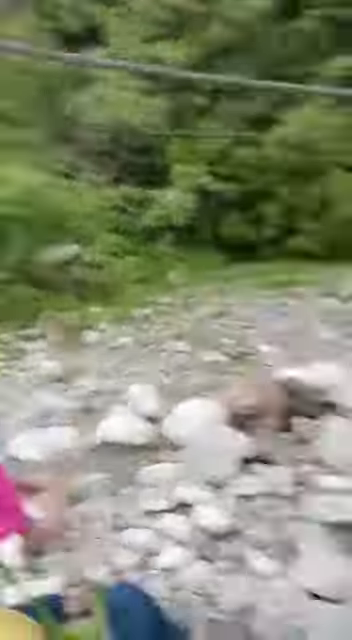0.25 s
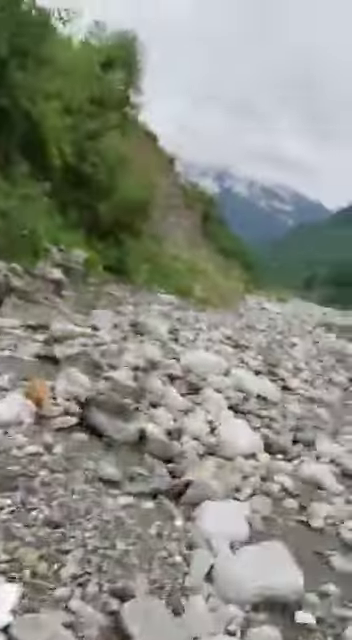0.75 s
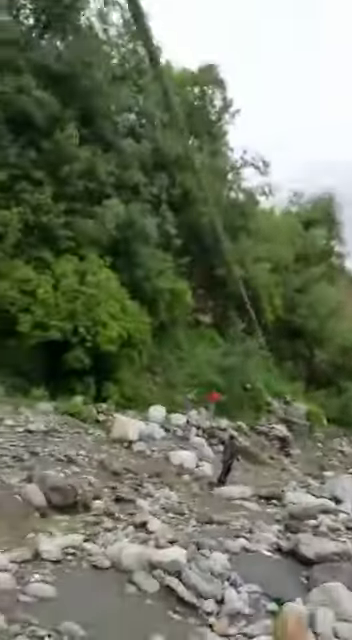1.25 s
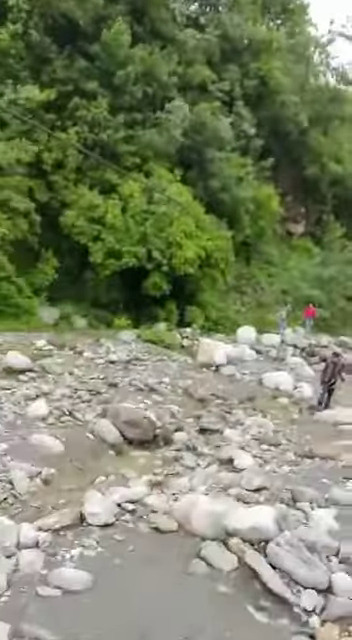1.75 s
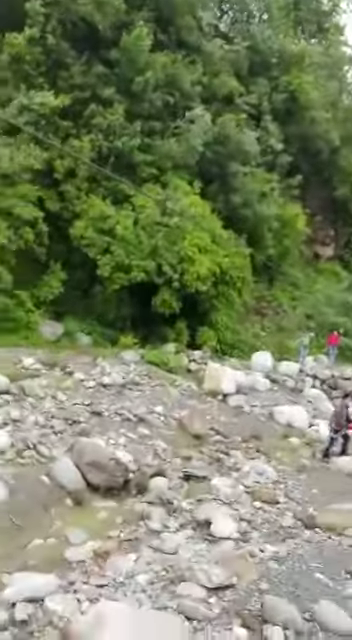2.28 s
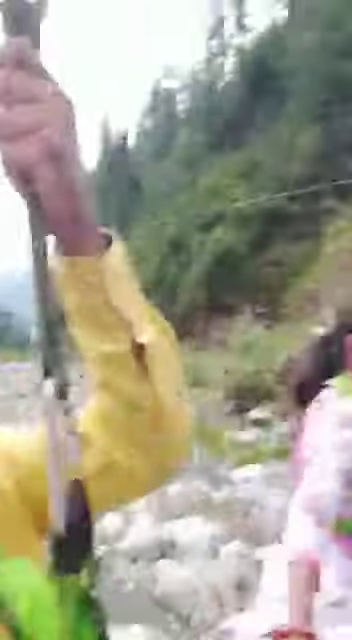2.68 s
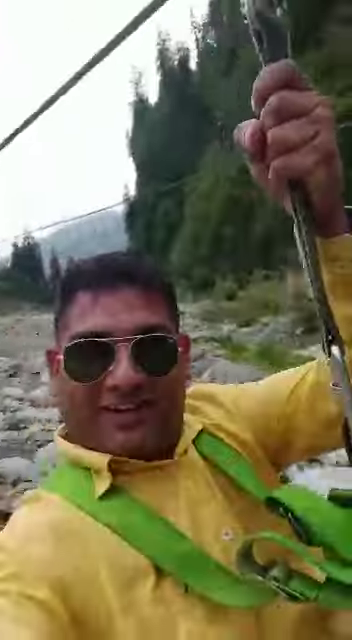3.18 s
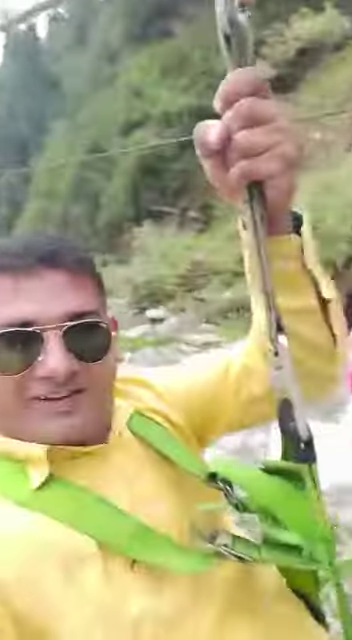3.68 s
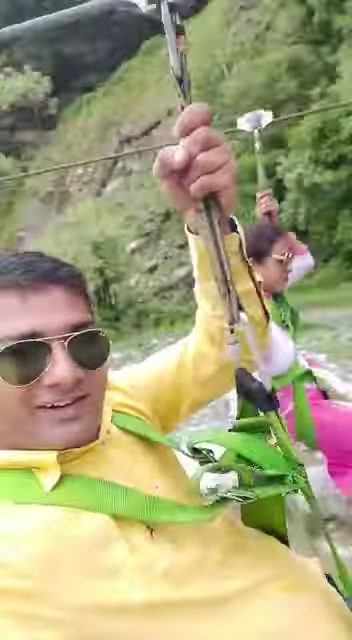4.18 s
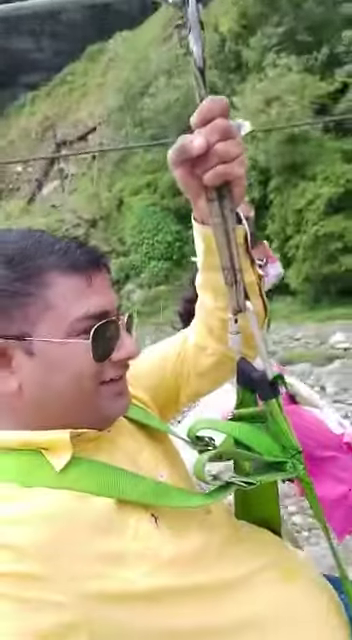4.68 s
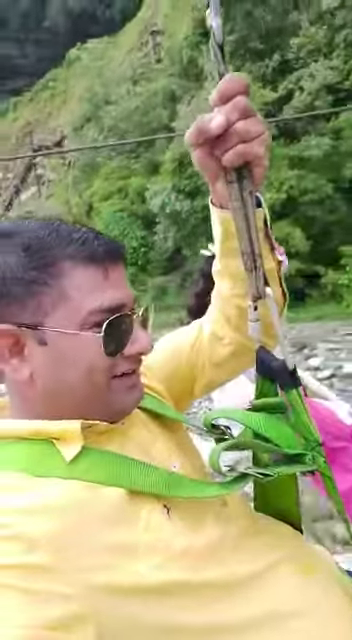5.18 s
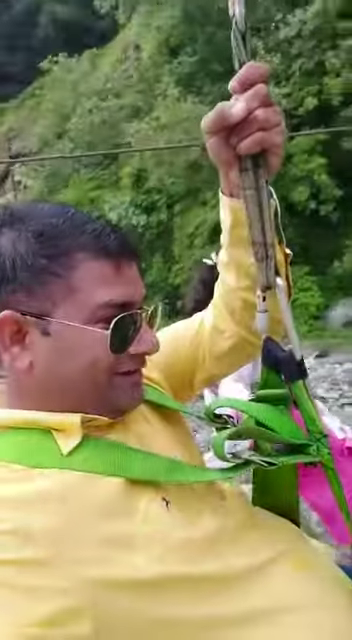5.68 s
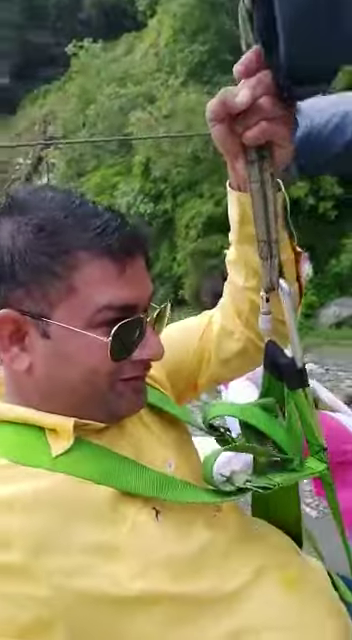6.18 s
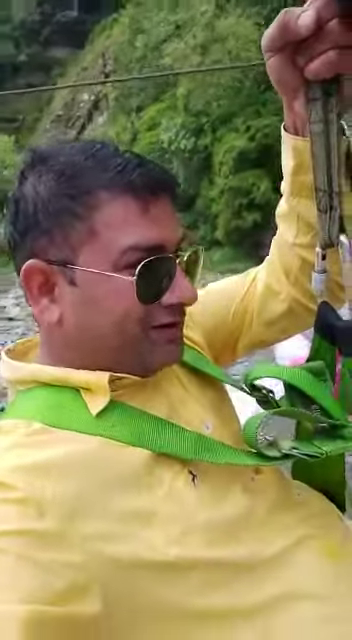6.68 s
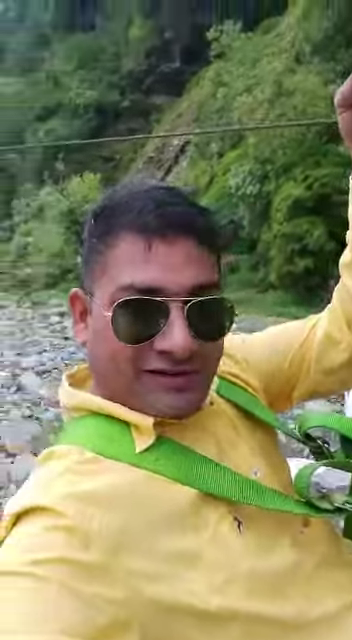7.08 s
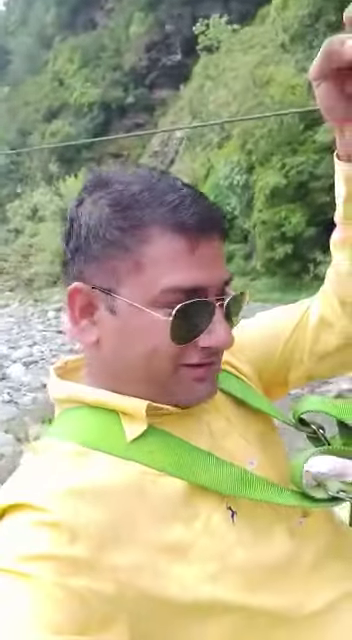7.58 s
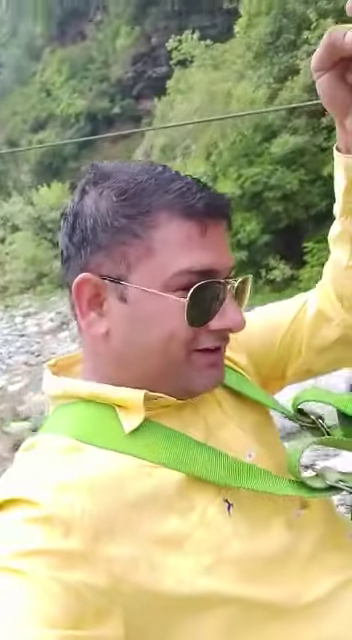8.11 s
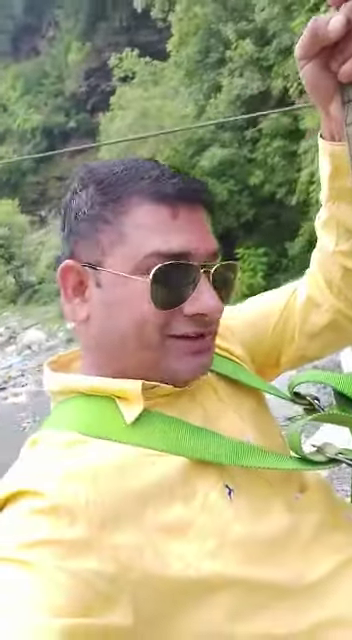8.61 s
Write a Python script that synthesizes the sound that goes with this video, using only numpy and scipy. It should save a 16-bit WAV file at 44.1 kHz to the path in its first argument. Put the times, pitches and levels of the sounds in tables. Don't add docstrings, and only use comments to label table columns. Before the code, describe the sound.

Close to handheld stereo microphones outdoors, pulley wheels roll continuously over a stranded steel cable: a bright, gritty metallic hiss with a fast buzzing flutter that slowly drops in pitch. Small ticks snap as the wheels cross raised wires. Wind puffs thump low. Near six seconds a glove scuffs the cable, and a low hum joins the slowing roll.

```python
import sys
import numpy as np
from scipy import signal
from scipy.fft import next_fast_len
from scipy.io import wavfile

SR = 44100
rng = np.random.default_rng(int(sys.argv[2]) if len(sys.argv) > 2 else 0)


def boost(x):
    u = np.asarray(x, float) / 20
    return 10 ** u


def put_to_file(sound):
    columns = np.atleast_2d(sound).T
    safe = np.clip(columns, -1, 1)
    whole_steps = np.round(safe * 32767)
    wavfile.write(sys.argv[1], SR, whole_steps.astype(np.int16))


N = 390285

# (time [s], strand rate [Hz])
STRAND_RATE = [(0, 287.2), (.6, 283.2), (3.5, 237.2), (4.1, 235.5), (6.0, 208.7), (8.2, 163.7),
               (8.85, 154.7)]
# (time [s], level [dB], brightness [dB/octave])
ROLL_LEVEL = [(0, -16.5, -1.5), (.15, -16, -2), (.3, -19, -1.5), (.72, -18.5, -1.2), (1.12, -18, 1.3),
              (1.35, -20.5, 1.4), (1.55, -20.5, 0.6), (2.35, -21.5, 1.5), (2.6, -17, -0.4), (3.3, -18, 1.6),
              (4.1, -18, -0.2), (4.35, -19, -0.6), (5.4, -19, 0), (5.78, -19, -0.5), (5.86, -21.5, -3),
              (5.98, -21, 0), (7.5, -22.5, -0.4), (8.85, -21.5, -0.9)]
# (time [s], lag of the right port [ms])
AIM_LAG = [(0, .278), (.25, .256), (.6, .31), (.95, .475), (1.15, .512), (1.8, .495), (2.4, .515),
           (2.62, .365), (2.85, .39), (3.5, .328), (4.15, .345), (4.5, .28), (4.78, .328), (6.2, .33),
           (6.7, .395), (7.2, .348), (7.8, .378), (8.4, .365)]
# (time [s], pose [0 sideways, 1 behind the hand, 2 facing, 3 braked])
HAND_POSE = [(0, 0), (.9, .1), (1.2, .35), (1.45, 1), (2.4, 1), (2.75, 1.3), (3.3, 2), (5.7, 2), (5.9, 2.6),
             (6.5, 3), (8.85, 3)]
# (frequency [Hz], density [dB/Hz])
CONTACT_COLOUR = [(250, -33), (400, -35), (800, -33), (1300, -34.5), (1900, -36), (2800, -38), (4000, -37),
                  (6000, -37), (8000, -41.5), (11000, -33), (13500, -42.5), (16000, -45)]
# (frequency [Hz], width [Hz], level sideways, behind, facing, braked [dB])
PLATE_MODES = [(1386, 118, -11.5, -16, -6.5, -11), (1854, 240, -15, -54, -12, -4),
               (2336, 590, -18, -8.5, -9.5, -2), (2380, 616, -6, -17, 0, -14.5),
               (3313, 200, -11, -2.5, -15.5, -38), (4365, 77, -12, -8.5, -11, -11.5),
               (5570, 1160, -14, -13, -8.5, -40), (5860, 290, -22, -23, -7, -6.5),
               (6244, 190, -5.5, -4.5, -8.5, -11), (6990, 950, -4, -9, -3.5, -1.5),
               (8500, 170, -25, -25, -16, -9), (8711, 120, -22, -11, -9.5, -18),
               (9930, 130, -25, -15, -8, -7.5), (11860, 260, -7.5, -4.5, -15, -12.5),
               (12900, 220, -3.5, -14, -14, -6), (14930, 450, -3.5, -3.5, -7, -7)]
# (frequency [Hz], share sideways, behind, facing, braked [0-1])
DIRECT_SHARE = [(500, .72, .7, .55, .82), (1100, .88, .68, .8, .86), (1700, .995, .74, .985, .93),
                (2600, .92, .76, .88, .78), (3500, .86, .84, .82, .6), (5200, .8, .84, .88, .52),
                (8000, .76, .6, .86, .62), (13000, .68, .6, .58, .48)]
# (frequency [Hz], sideways, behind, facing, braked [cycles])
BEND_PHASE = [(800, .04, .24, .03, .04), (2200, 0, .18, .01, .01), (4000, -.04, .12, -.09, -.15),
              (4900, -.1, .05, .07, -.14), (6000, -.1, .15, .03, .14), (7600, -.28, -.25, 0, .05),
              (10000, .2, 0, 0, .1), (13000, 0, -.3, -.08, 0)]
# (frequency [Hz], level sideways, behind, facing, braked [dB])
POSE_TILT = [(777, -13.5, -15.5, -12.5, -3), (2550, 4, 0.6, 0.16, 0.7), (5290, -3, -2, -4.5, -7),
             (11150, -8.5, -9, -7.5, -11)]
POSE_LEAN_DB = [0.45, -0.15, 0.21, -0.057]
# (time [s], peak [dB])
PROUD_WIRES = [(0.5467, -1), (0.602, -6), (0.9034, -5), (0.9495, -4), (2.593, -9), (2.6579, -8),
               (3.0929, -12), (3.1217, -1), (3.5154, -4), (3.728, 3), (3.825, -8), (3.9485, -7),
               (3.9734, -7), (4.0552, -5), (4.089, -5), (4.1757, -12), (4.213, -6), (4.3525, -5),
               (4.6883, -7), (4.7232, -1), (4.8294, -4), (4.856, -5), (4.9583, -6), (4.9851, -4),
               (5.016, -7), (5.085, -3), (5.116, -8), (5.2131, -12), (5.245, -5), (5.2779, -2),
               (5.3472, -6), (5.4608, 2), (5.685, -5), (6.883, -9), (6.91, -8), (7.907, -9), (8.031, -5),
               (8.0611, -10), (8.091, -3.5), (8.201, -6), (8.4042, -5), (8.4481, -5), (8.6502, -7),
               (8.729, -5), (8.7915, -7)]
# (multiple of strand rate, level held sideways, rolling free, braked [dB])
HUM_TONES = [(1, -48, -49, -30.5), (2, -51, -51, -35), (3, -42.5, -53, -37)]
# (time [s], peak [dB], fade [s])
GLOVE_CLAMPS = [
    (5.899, -7, .014),
    (5.919, -9, 0.012),
]
# (time [s], strength [dB], shelter of the right port [dB])
WIND_LEVEL = [(0, -26.5, -16), (.75, -31.5, -18), (.95, -33, -0.5), (2.4, -31, -1), (2.7, -27, -10),
              (2.95, -28.5, -24), (4.2, -32, -18), (4.45, -29.5, -2), (5.0, -23.5, -6.5), (5.7, -23.5, -4),
              (6.2, -22, -2), (6.5, -29.5, 2), (7.5, -24.5, -0.5), (8.85, -26.5, -0.5)]
# (frequency [Hz], density [dB/Hz])
GUST_COLOUR = [(25, -41), (45, -1), (80, -1), (130, -3), (200, -8.5), (300, -11.5), (450, -40)]
# (frequency [Hz], density [dB/Hz])
RUMBLE_COLOUR = [(25, -32), (45, -11), (80, -4.5), (130, -3), (200, -3.5), (300, -1.5), (450, -9.5)]
WIND_SHARE = [.12, .55, .05, .8]
# (time [s], peak [dB], frequency [Hz], left-right [dB])
WIND_PUFFS = [(0.305, -16, 83.4, -2), (0.85, -15.5, 86.8, -3), (0.93, -22.5, 200, 0), (0.997, -17, 79, -2),
              (1.196, -18.5, 77, -1), (1.327, -26, 104, -2), (1.501, -20.5, 72, 2.5),
              (1.871, -27, 82.1, -3), (2.554, -16.5, 131, -2), (2.721, -14.5, 99, 7), (2.786, -14, 90, 1),
              (2.897, -24, 81.1, 21), (3.293, -33, 70, 13), (4.454, -17.5, 79.2, 10),
              (4.551, -12.5, 121, 2), (4.791, -24, 76, 7.0), (4.883, -21, 145, 3), (5.068, -24, 67, 6),
              (5.185, -22, 127, 4.5), (5.455, -20, 114, -10), (5.564, -24, 113.3, -3),
              (5.652, -15.5, 129, 2), (5.754, -19, 127, 11), (5.823, -16.5, 85.7, 7.0),
              (5.89, -14, 75.5, -6), (5.956, -14.5, 174, -1), (6.0, -18, 181, 0), (6.218, -10.5, 97.2, -1),
              (6.352, -16.5, 90, 0)]

TILT_PIVOT_HZ, LEFT_BRIGHT_DB_PER_OCTAVE = 3000, 0.8
LEAN_DB_PER_MS, AHEAD_MS = 8, 0.36
WOBBLE_CYCLES, WOBBLES_PER_S = 0.045, 5
KINK_GAIN_DB, KINK_RISE_S = 5, 0.00075
BRAKE_ON_S, BRAKE_BITE_S, BRAKE_OFF_S, BRAKE_EASE_S = 6.2, 0.3, 8.5, 0.4
GUST_DB, GUSTS_PER_S = 1.5, 4.4
PUFF_SKEW_CYCLES = 0.097
CONTROL_STEP = 64
HALVES = np.array([[0.5], [-0.5]])


def trolley(turns, pose):
    lag_ms, = in_time(AIM_LAG)
    pan_db = np.interp(pose, range(4), POSE_LEAN_DB) + LEAN_DB_PER_MS * (lag_ms - AHEAD_MS)
    force = contact(turns, pulse_db=6.5, strand_db=1.6, grit_db=1.3, flutter_db=1.2) + kinks()
    white = rng.standard_normal((4, 3, N)) * force[[0, 1, 0, 1], None]
    direct = [to_ports(w[0], lag_ms) for w in white]
    quarter = [signal.hilbert(d[1], next_fast_len(N))[:N].imag for d in direct]
    slow_pose = pose[::CONTROL_STEP]
    near_db, bright_db = in_time(ROLL_LEVEL)[:, ::CONTROL_STEP]

    def feed(k, hz):
        wobble = WOBBLE_CYCLES * np.clip(hz / 5000, 0.2, 1.5) * drift(WOBBLES_PER_S)[::CONTROL_STEP]
        share = by_pose(DIRECT_SHARE, hz, slow_pose)
        angle = 2 * np.pi * (by_pose(BEND_PHASE, hz, slow_pose) + wobble)
        left, right = direct[k]
        bent = held(np.cos(angle)) * right - held(np.sin(angle)) * quarter[k]
        octaves = max(np.log2(hz / TILT_PIVOT_HZ), 0)
        level_db = near_db + by_pose(POSE_TILT, hz, slow_pose) + bright_db * octaves
        heard = held(np.sqrt(share)) * np.array([left, bent])
        scattered = held(np.sqrt(1 - share)) * white[k, 1:]
        return boost(LEFT_BRIGHT_DB_PER_OCTAVE * octaves * HALVES) * (heard + scattered), held(level_db)

    out = 0
    edges_hz = 280 * 2 ** (np.arange(19) / 3)
    for k, (low_hz, high_hz) in enumerate(zip(edges_hz, edges_hz[1:])):
        hz = np.sqrt(low_hz * high_hz)
        x, level_db = feed(k % 2, hz)
        colour_db = at_hz(CONTACT_COLOUR, hz) + 1.2 * drift(9)
        out = out + boost(level_db + colour_db) * np.sqrt(SR / 2) * band(x, low_hz, high_hz)
    for k, (hz, width_hz, *pose_db) in enumerate(PLATE_MODES):
        x, level_db = feed(2 + k % 2, hz)
        mode_db = held(np.interp(slow_pose, range(4), pose_db)) + 0.9 * drift(6)
        rung = resonance(resonance(x, hz, 1.7 * width_hz), hz, 1.7 * width_hz)
        out = out + boost(level_db + mode_db) * rms_one(rung)
    out = signal.sosfilt(signal.butter(6, 300, "high", fs=SR, output="sos"), out)
    return out * boost(pan_db * HALVES)


def contact(turns, pulse_db, strand_db, grit_db, flutter_db):
    sizes = rng.standard_normal((2, N // 100))[:, turns.astype(int)]
    bump = 0.5 - 0.5 * np.cos(2 * np.pi * turns)
    grit = np.minimum(rng.exponential(1, (2, N // 16 + 1)), 5)
    grit = np.repeat(grit, 16, axis=1)[:, :N]
    flutter = 0.37 * drift(15) + np.array([drift(67), drift(35)])
    strength_db = bump ** 2 * (pulse_db + strand_db * sizes) + grit_db * grit + flutter_db * flutter
    return rms_one(boost(strength_db))


def kinks():
    s, db = np.transpose(PROUD_WIRES)
    at = (s * SR).astype(int)
    t = np.arange(round(0.012 * SR)) / SR / KINK_RISE_S
    hits = np.zeros(N)
    hits[at] = boost(db + KINK_GAIN_DB - 1.5 * (in_time(ROLL_LEVEL)[0][at] + 18))
    return signal.lfilter(t * np.exp(1 - t), [1], hits)


def cable_hum(turns, pose):
    t = np.arange(N) / SR
    bite = (t - BRAKE_ON_S) / BRAKE_BITE_S
    ease = 1 - (t - BRAKE_OFF_S) / BRAKE_EASE_S
    grip = np.clip(np.minimum(bite, ease), 0, 1)
    lag_ms, = in_time(AIM_LAG)
    tones = []
    for k, (_, side_db, free_db, braked_db) in enumerate(HUM_TONES):
        level_db = np.interp(pose, [0, 1], [side_db, free_db]) + grip * (braked_db - free_db)
        strength = np.sqrt(2) * boost(level_db + 1.3 * drift(12))
        tone = strength * np.sin(2 * np.pi * (k + 1) * turns + 0.3 * drift(15))
        tones.append(to_ports(tone, lag_ms))
    tones[0][1] *= boost(np.clip(in_time(WIND_LEVEL)[1] + 4, -20, 0))
    return sum(tones)


def clamp():
    t = np.arange(N) / SR
    fade = 0
    for s, db, fade_s in GLOVE_CLAMPS:
        fade = fade + boost(db) * (t >= s) * np.exp(-np.maximum(t - s, 0) / fade_s)
    scuff = rms_one(band(rng.standard_normal(N), 400, 3000))
    return to_ports(0.45 * fade * scuff, in_time(AIM_LAG)[0])


def wind(pose):
    braked = np.clip(3 * (pose - 2) - 2, 0, 1)
    alike = np.interp(pose, range(4), WIND_SHARE)
    noise = 0
    edges_hz = 25 * 2 ** np.arange(0, 4.6, 0.5)
    for low_hz, high_hz in zip(edges_hz, edges_hz[1:]):
        shared, *own = rng.standard_normal((3, N))
        mix = np.sqrt(alike) * shared + np.sqrt(1 - alike) * np.array(own)
        hz = np.sqrt(low_hz * high_hz)
        colour_db = (1 - braked) * at_hz(GUST_COLOUR, hz) + braked * at_hz(RUMBLE_COLOUR, hz)
        noise = noise + boost(colour_db) * band(mix, low_hz, high_hz)
    lumps = boost((1 - 0.7 * braked) * 3.3 * np.array([drift(18), drift(18)]))
    strength_db, shelter_db = in_time(WIND_LEVEL)
    gusts_db = (1 - 0.42 * braked) * GUST_DB * np.array([drift(GUSTS_PER_S), drift(GUSTS_PER_S)])
    port_db = strength_db + shelter_db * np.array([[0], [1]]) + gusts_db - 3.0
    out = boost(port_db) * rms_one(noise * lumps)
    add_puffs(out)
    return out


def add_puffs(out):
    t = np.arange(round(0.08 * SR)) / SR
    rush = rms_one(band(rng.standard_normal((len(WIND_PUFFS), 2, len(t))), 136, 347))
    swell = t / 0.013 * np.exp(1 - t / 0.01)
    quick_s = 0.0022 * (1 - np.exp(-t / 0.0017))
    for (s, db, hz, pan_db), air in zip(WIND_PUFFS, rush):
        skew = PUFF_SKEW_CYCLES * rng.choice([-1, 1]) * np.array([[1], [-1]])
        swing = np.sin(2 * np.pi * (skew + hz * (t + quick_s)))
        hard = np.clip((db + 23) / 9, 0, 1)
        puff = boost(db - 4.0) * (swing + 0.73 * hard * air) * swell
        at = round(s * SR)
        out[:, at:at + len(t)] += puff * boost(pan_db * HALVES)


def to_ports(x, lag_ms):
    fine = signal.resample_poly(x, 4, 1)
    late = np.interp(4 * (np.arange(N) - lag_ms * SR / 1000), np.arange(len(fine)), fine)
    return np.array([x, late])


def resonance(x, hz, width_hz):
    r = np.exp(-np.pi * width_hz / SR)
    zeros = np.array([1, 0, -1]) * (1 - r * r) / 2
    return signal.lfilter(zeros, [1, -2 * r * np.cos(2 * np.pi * hz / SR), r * r], x)


def band(x, low_hz, high_hz):
    sos = signal.butter(2, [low_hz, min(high_hz, 0.49 * SR)], "band", fs=SR, output="sos")
    return signal.sosfilt(sos, x)


def drift(rate_hz):
    r = np.exp(-40 * np.pi * rate_hz / SR)
    slow = signal.lfilter([1], [1, -2 * r, r * r], rng.standard_normal(N // 20 + 4002))[4000:]
    return np.interp(np.arange(N) / 20, np.arange(len(slow)), rms_one(slow - slow.mean()))


def rms_one(x):
    return x / np.sqrt(np.mean(x ** 2) + 1e-20)


def in_time(rows):
    s, *columns = np.transpose(rows)
    return np.array([np.interp(np.arange(N) / SR, s, c) for c in columns])


def at_hz(points, hz):
    points = np.array(points)
    return np.interp(np.log(hz), np.log(points[:, 0]), points[:, 1])


def by_pose(rows, hz, pose):
    rows = np.array(rows)
    return np.interp(pose, range(4), [at_hz(rows[:, [0, k]], hz) for k in range(1, 5)])


def held(slow):
    return np.repeat(slow, CONTROL_STEP)[:N]


def scene():
    turns = np.cumsum(in_time(STRAND_RATE)[0]) / SR
    pose = np.clip(in_time(HAND_POSE)[0], 0, 3)
    return trolley(turns, pose) + cable_hum(turns, pose) + clamp() + wind(pose)


def low_pass(x):
    return signal.sosfilt(signal.butter(12, 15870, fs=SR, output="sos"), x)


def record(dry):
    soft = 1.2 * np.tanh(dry / 1.2)
    return low_pass(np.clip(soft, -1, 1))


dry = scene()
out = record(dry)
put_to_file(out)
```